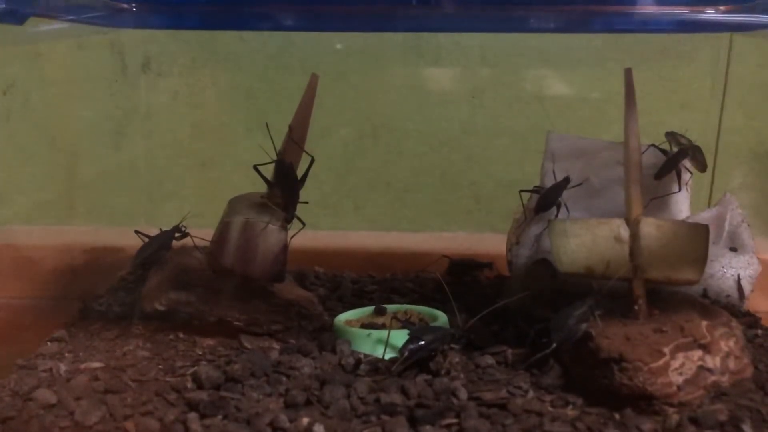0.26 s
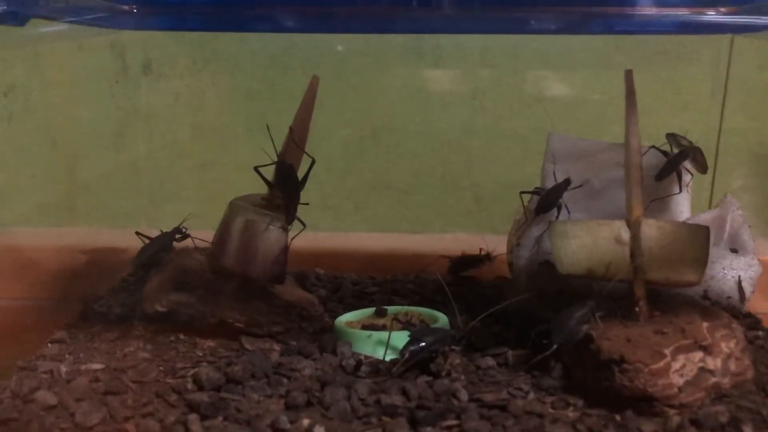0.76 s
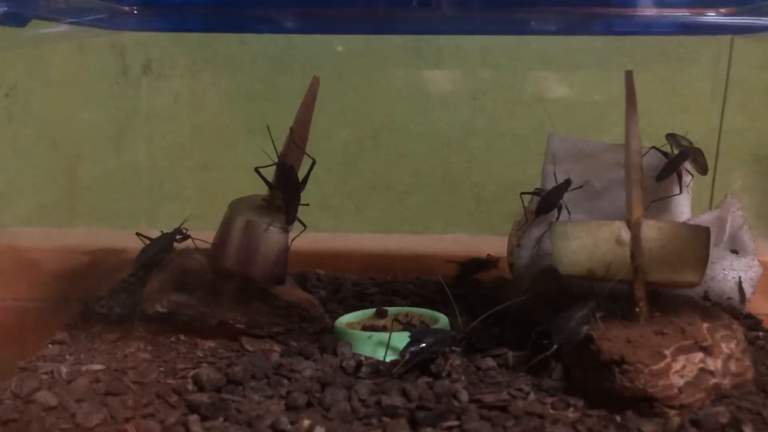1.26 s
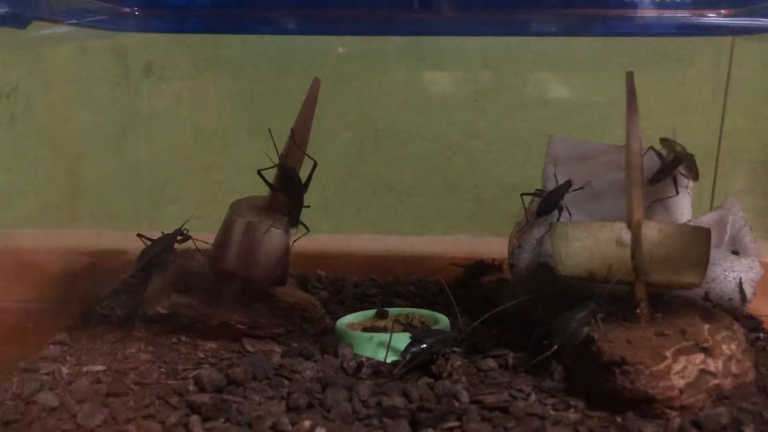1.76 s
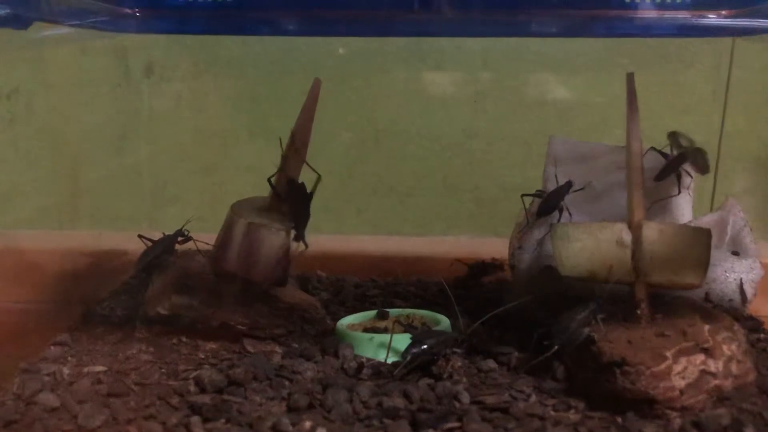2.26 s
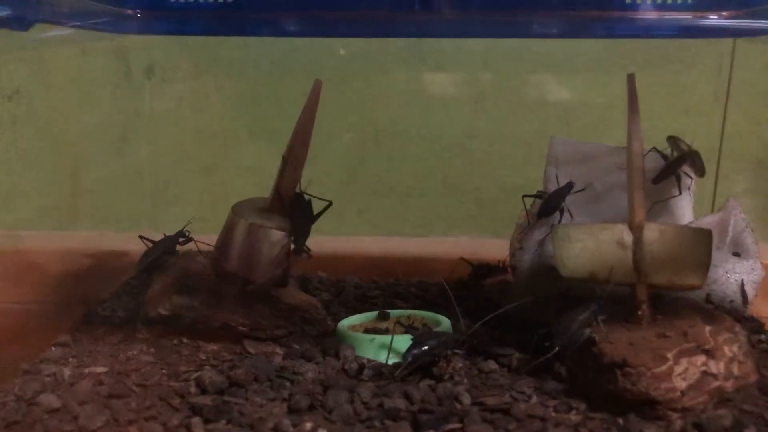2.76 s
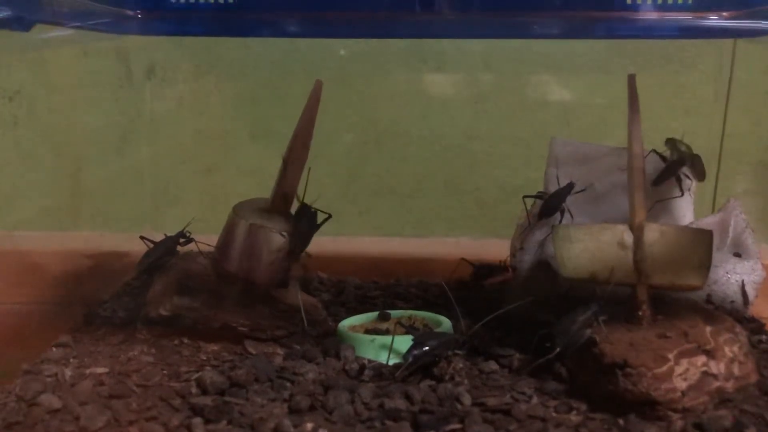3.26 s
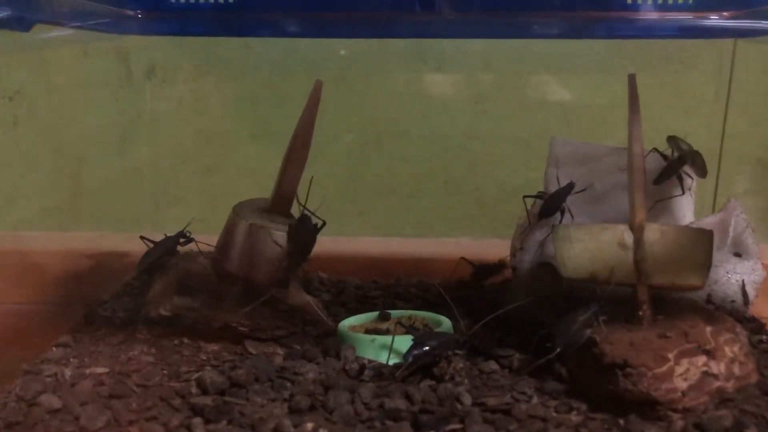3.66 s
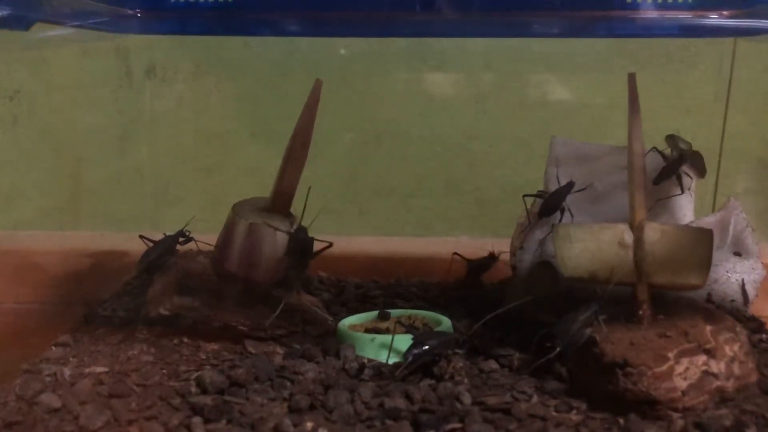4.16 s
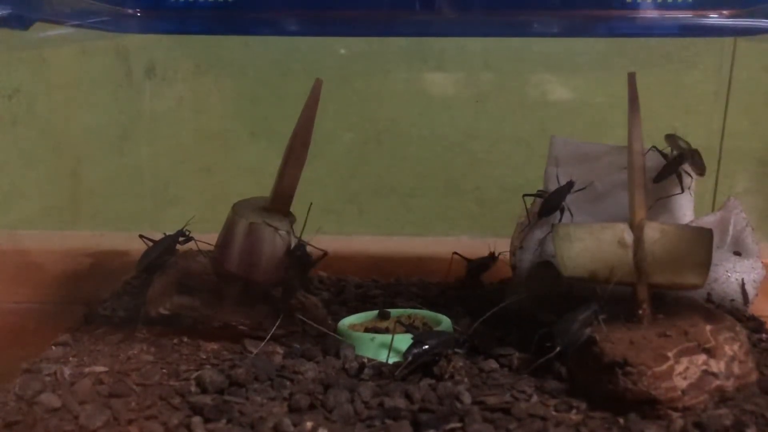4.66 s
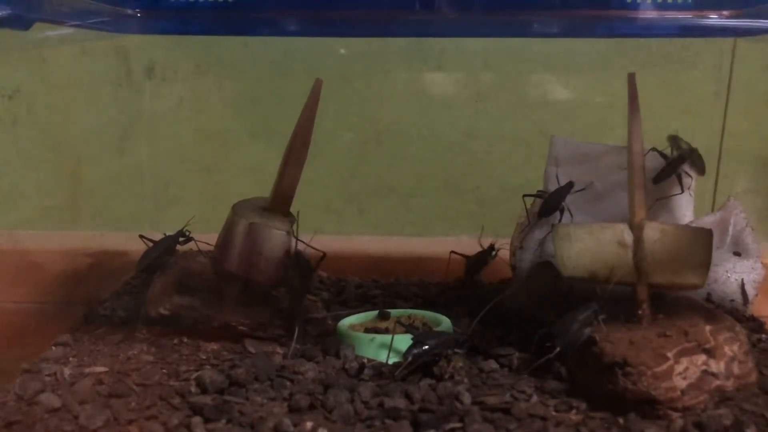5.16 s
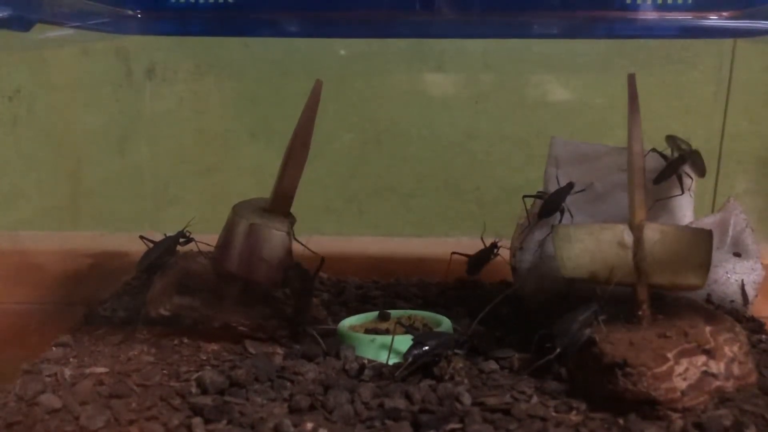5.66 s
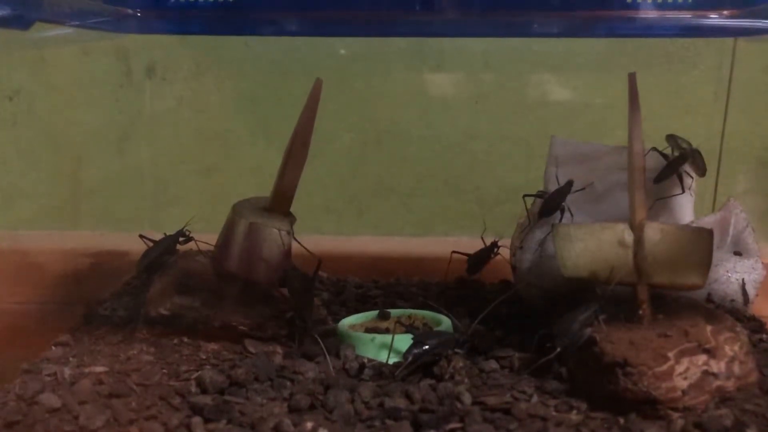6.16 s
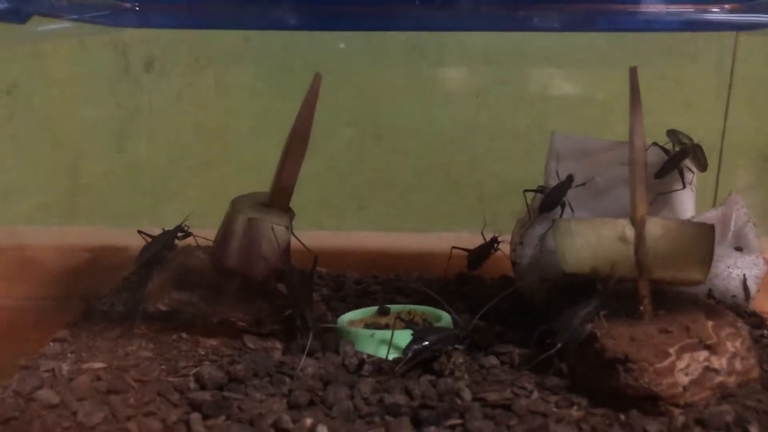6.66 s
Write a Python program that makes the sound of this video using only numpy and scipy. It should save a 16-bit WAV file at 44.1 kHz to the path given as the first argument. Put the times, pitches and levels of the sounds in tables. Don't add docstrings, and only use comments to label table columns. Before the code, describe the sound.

Several bell crickets sing overlapping high, ringing, rapidly pulsing trills in a glass tank, over a faint hum and hiss in a quiet room.

```python
import sys
import numpy as np
from scipy import signal
from scipy.fft import rfft, irfft
from scipy.io import wavfile

SR = 44100
rng = np.random.default_rng(int(sys.argv[2]) if len(sys.argv) > 2 else 0)


def elevation(decibels):
    levels = np.asarray(decibels, float)
    return 10 ** (levels / 20)


def dump(signal):
    limited = np.clip(np.atleast_2d(signal).T, -1, 1)
    pcm = np.round(limited * 32767).astype(np.int16)
    wavfile.write(sys.argv[1], SR, pcm)


N = 304290
TIME = np.arange(N) / SR
# (time [s], level [dB], time to fall 60 dB [s])
SKIDS = [
    (0.315, -59, 0.023),
    (4.233, -37, 0.018),
    (5.124, -37, 0.062),
    (5.215, -44, 0.024),
]


def columns(rows, at=TIME):
    s, *rest = np.transpose(rows)
    return [np.interp(at, s, c) for c in rest]


def coloured(points, gate=1):
    hz, db = np.transpose(points)
    grid_hz = np.arange(N // 2 + 1) * SR / N + 1e-3
    shape = elevation(np.interp(np.log(grid_hz), np.log(hz), db, -200, -200))
    spectrum = rfft(gate * rng.standard_normal(N))
    return irfft(spectrum * shape / np.sqrt(np.mean(shape ** 2)), N)


def narrow(hz, width):
    r = np.exp(-np.pi * width / SR)
    a = [1, -2 * r * np.cos(2 * np.pi * hz / SR), r * r]
    once = signal.lfilter([1, 0, -1], a, rng.standard_normal(N + SR))
    x = signal.lfilter([1], a, once)[SR:]
    return x / x.std()


def room(dry, wet_db, glass_db, wall_db):
    # (centre [Hz], time to fall 60 dB [s], level [dB])
    tail_bands = [(4700, .5, 0), (9500, .27, -7), (14300, .25, -3.5)]
    wall_s = 0.008
    t = np.arange(SR // 2) / SR
    reply = np.zeros(SR // 2)
    for hz, t60, db in tail_bands:
        band = signal.butter(2, [hz - 2400, hz + 2400], "band", fs=SR, output="sos")
        tail = rng.standard_normal(SR // 2) * elevation(-60 * t / t60) * np.clip(t / .008, 0, 1)
        tail *= elevation(wet_db) * np.sqrt(np.log(1e6) / SR / tail_bands[0][1])
        tail[round(wall_s * SR)] += elevation(wall_db)
        reply += elevation(db) * signal.sosfilt(band, tail)
    glass = rng.standard_normal(SR // 2) * elevation(-60 * t / 0.023)
    reply += elevation(glass_db) * glass / np.sqrt(np.sum(glass ** 2))
    heard = dry + signal.fftconvolve(dry, reply)[:N]
    return heard / np.sqrt(1 + elevation(2 * wet_db) + elevation(2 * glass_db) + elevation(2 * wall_db))


def strokes(phrases, count):
    out = []
    for s, total, first_ms, last_ms, drag_ms in phrases:
        k = np.arange(total - 1)
        slowing = (k / (total - 1)) ** 2
        beats_ms = first_ms + (last_ms - first_ms) * slowing + drag_ms * (k < count)
        out.append(s + np.append(0, np.cumsum(beats_ms)) / 1000)
    return out


def unskidded(phrases):
    times = np.concatenate(phrases)
    late = times[:, None] - np.array(SKIDS)[:, 0]
    return times[~np.any((late > 0) & (late < .017), axis=1)]


def tiring(phrases, fresh, opening, closing, entry=(0, .01)):
    offset, settle_s = entry
    rows = []
    for p, a, b in zip(phrases, opening, closing):
        settled = p[0] + settle_s
        tired = settled + np.clip(fresh, .01, .5) * (p[-1] - p[0] - settle_s)
        rows += [(p[0] - .008, a + offset), (settled, a), (tired, a), (p[-1] + .006, b)]
    return columns(rows)[0]


def wings(times, pitch_hz, partials_db, duty, lead, sag, rasp_db, tick_db, uneven_db):
    # (frequency [Hz], level per Hz [dB])
    rasp_spectrum = [(2500, -35), (3600, -17), (4030, -11), (4170, 7), (4500, -6.5), (5300, 2.5),
                     (6100, -5), (6600, -10), (8500, -12.5), (10100, -8), (10400, -30), (10800, -16.5),
                     (11200, -11.5), (15800, -15.5)]
    # (frequency [Hz], level per Hz [dB])
    tick_spectrum = [(4600, -16), (5300, -6), (5900, 4), (6500, -8), (7500, -10.5), (9000, -17.5),
                     (10600, -15.5), (11800, -15.5), (13500, -24), (14900, -6.5), (15500, -3),
                     (15820, -12.5)]
    luck = np.clip(rng.standard_normal((len(times), 5)), -1.8, 1.8)

    beat, usual = np.diff(times, append=np.inf), np.median(np.diff(times))
    beat = np.where(beat > 3 * usual, usual, np.minimum(beat, 1.7 * usual))
    duty_then = (duty * np.ones(N))[(times * SR).astype(int)]
    length = beat * duty_then * (1 + .05 * luck[:, 1])
    starts = times - lead * length + 0.00017 * luck[:, 0]

    which = np.clip(np.searchsorted(starts, TIME) - 1, 0, None)
    since = TIME - starts[which]
    along = np.clip(since / length[which], 0, 1)
    swell = np.sin(np.pi / 2 * np.clip(along / .3, 0, 1) * np.clip((1 - along) / .4, 0, 1)) ** 2
    swell *= 2 * elevation(uneven_db * luck[which, 3])

    hz = pitch_hz * (1 + sag * (.5 - along) + .004 * luck[which, 2])
    phase = 2 * np.pi * np.cumsum(hz) / SR + 10 * luck[which, 0]
    tone = swell * sum(elevation(db) * np.sin((k + 1) * phase) for k, db in enumerate(partials_db))
    rasp = coloured(rasp_spectrum, swell * elevation(partials_db[0] + rasp_db))
    catch = (since > 0) * elevation(-60 * np.abs(since) / .006 + 3 * luck[which, 4])
    return tone + rasp + coloured(tick_spectrum, catch * elevation(partials_db[0] + tick_db))


def room_tone():
    # (frequency [Hz], level per Hz [dB])
    hum = [(15, -73), (25, -33), (45, -17.5), (65, 2.5), (92, -7.5), (124, 0), (201, -8), (231, -4),
           (300, -6.5), (331, -6.5), (374, -10.5), (438, -7), (816, -14), (1930, -17), (3000, -27.5),
           (3900, -62), (6600, -120)]
    # (frequency [Hz], level per Hz [dB])
    hiss = [(1760, -27.5), (3000, -5), (3260, -8.5), (3590, -4), (4880, -13.5), (5420, -2), (5970, -12),
            (7350, -12), (9320, -15), (10600, -16.5), (12200, -19), (15200, -6), (15800, -5)]
    # (frequency [Hz], width [Hz], level [dB])
    distant = [(5560, 220, -82.5), (5160, 120, -94), (119.6, 8.3, -74.5)]
    # (time [s], level [dB])
    rustle = [
        (.18, -100),
        (.24, -73),
        (.3, -68.5),
        (.42, -77),
        (.55, -78),
        (.7, -100),
    ]
    tones = sum(elevation(db) * narrow(hz, width) for hz, width, db in distant)
    scratch = elevation(columns(rustle)[0]) * narrow(4400, 700)
    return elevation(-65.5) * coloured(hum) + elevation(-71.5) * coloured(hiss) + tones + scratch


def skids():
    gate = sum(elevation(db - 60 * np.abs(TIME - s) / t60) * (TIME > s) for s, db, t60 in SKIDS)
    rasp = coloured([(2800, -18.5), (4200, 2), (7500, 1.5), (9500, -21.5), (11500, 4.0), (15800, -27)], gate)
    return room(rasp, wet_db=-9.5, glass_db=-2.5, wall_db=-9.5)


def back_male():
    # (first stroke [s], strokes [count], first beat [ms], last beat [ms], drag of opening beats [ms])
    beats = [
        (.5679, 6, 18.36, 18.36, 0),
        (.7677, 25, 17.3, 17.62, 0),
        (1.2517, 29, 17.56, 17.49, 0),
        (2.2267, 21, 18.9, 18.46, 0),
        (3.3086, 21, 18.77, 20.15, 0),
        (4.5159, 33, 18.16, 18.7, 0),
        (5.5726, 43, 18.4, 19.71, 0),
    ]
    # (fresh level [dB], spent level [dB], wing pitch [Hz], sounding share of a beat [0-1])
    voice = [(-41.5, -43.5, 4800, .23), (-41.5, -36.5, 4760, .4), (-37.5, -42, 4710, .51),
             (-38, -30, 4705, .53), (-32, -32.5, 4710, .58), (-33, -37, 4680, .56), (-33.5, -41, 4675, .6)]
    phrases = strokes(beats, count=0)
    fresh_db, spent_db, pitch_hz, share = np.transpose(voice)
    db = tiring(phrases, 0.18, fresh_db, spent_db, entry=(-1.5, .06))
    hz = tiring(phrases, 0, pitch_hz, pitch_hz - 30)
    duty = tiring(phrases, 0, .9 * share, 1.3 * share)
    song = wings(np.concatenate(phrases), hz, [db, db - 15.5, db - 39.5],
                 duty, lead=0.09, sag=.035, rasp_db=-18, tick_db=-11, uneven_db=1.5)
    return room(song, wet_db=-2.0, glass_db=-3.5, wall_db=-1.5)


def chorus():
    # (time [s], peak level [dB], hold [s], fade [dB/s])
    swells = [
        (0.89, -28, 0.065, 42.5),
        (1.2, -41, 0.55, 20),
        (1.813, -30.5, 0.2, 21),
        (2.62, -30, .15, 19),
        (2.907, -25.5, 0.042, 29.5),
        (3.36, -29.5, 0.19, 30),
        (3.64, -27.5, 0.37, 37),
        (4.197, -23.5, 0.034, 18.5),
        (5.1, -28.5, 0.56, 19.5),
    ]
    # (time [s], pitch [Hz])
    pitch = [(0.9, 4773), (1.63, 4677), (1.94, 4797), (2.23, 4685), (3.17, 4775), (4.82, 4668),
             (5.16, 4774), (5.36, 4688), (6.38, 4684)]
    rise_db_per_s, stop_s = 221, 6.38
    levels_db = []
    for s, peak_db, hold, fade in swells:
        rising = rise_db_per_s * np.clip(s - TIME, 0, None)
        fading = fade * np.clip(TIME - s - hold, 0, None)
        levels_db.append(peak_db - rising - fading)
    db = np.max(levels_db, axis=0)
    mean_hz, = columns(pitch)
    partials_db = [db - 6.5, db - 29, db - 43]
    song = sum(wings(np.arange(.8, 6.37, 1 / beats_hz), mean_hz * tuning, partials_db,
                     duty=.7, lead=0, sag=.04, rasp_db=-21.5, tick_db=-10, uneven_db=2.1)
               for beats_hz, tuning in [(53.3, .966), (56.1, .992), (54.6, 1.022)])
    return room(song * (TIME < stop_s), wet_db=1.0, glass_db=-4.5, wall_db=-16)


def ticking_male():
    # (first stroke [s], strokes [count], first beat [ms], last beat [ms], drag of opening beat [ms])
    beats = [
        (.8898, 15, 18.32, 18.07, 0),
        (1.872, 16, 18.86, 18.7, 13.57),
        (2.9285, 21, 18.88, 19.29, 0),
        (3.676, 27, 19.17, 21.62, 0),
    ]
    # (fresh level [dB], spent level [dB], wing pitch [Hz], pitch lost by the end [Hz])
    voice = [(-28, -34, 4815, 35), (-24.5, -34.5, 4850, 110), (-26, -33, 4840, 89), (-26, -34.5, 4845, 83)]
    fresh = .3
    phrases = strokes(beats, count=1)
    fresh_db, spent_db, pitch_hz, sink_hz = np.transpose(voice)
    db = tiring(phrases, fresh, fresh_db, spent_db, entry=(0.3, .04))
    hz = tiring(phrases, fresh, pitch_hz, pitch_hz - sink_hz)
    song = wings(np.concatenate(phrases), hz, [db, db - 18.0, db - 36.5],
                 duty=.74, lead=.12, sag=.03, rasp_db=-32, tick_db=-5.5, uneven_db=0.5)
    return room(song, wet_db=0.9, glass_db=-1.5, wall_db=-1.5)


def front_male():
    # (first stroke [s], strokes [count], first beat [ms], last beat [ms], drag of opening beats [ms])
    beats = [
        (1.1646, 38, 17.48, 19.75, 0),
        (1.9643, 35, 17.22, 19.34, 0),
        (2.5905, 39, 17.37, 20.33, 4.98),
        (3.338, 44, 17.7, 20.6, 7.38),
        (4.1945, 46, 18.1, 18.89, 14.07),
        (5.0905, 45, 18.53, 19.2, 5.58),
    ]
    # (fresh octave [dB], spent octave [dB], wing pitch [Hz], fundamental over octave [dB])
    voice = [(-53, -51, 4738, 5.5), (-43, -57, 4755, 4.5), (-38.5, -51, 4745, 12), (-40.5, -47, 4750, 10.5),
             (-38, -49, 4742, 8), (-39, -46.5, 4750, 10)]
    phrases = strokes(beats, count=2)
    fresh_db, spent_db, pitch_hz, over_db = np.transpose(voice)
    second = tiring(phrases, .08, fresh_db, spent_db, entry=(-5, .025))
    third = -49.5 + 1.6 * (second + 40)
    first = second + tiring(phrases, 0, over_db, over_db)
    hz = tiring(phrases, 0, pitch_hz, pitch_hz - 24.95, entry=(50, .14))
    song = wings(unskidded(phrases), hz, [first, second + 0.92, third],
                 duty=.74, lead=.46, sag=.028, rasp_db=-26, tick_db=-19.5, uneven_db=-1.7)
    return room(song, wet_db=2.5, glass_db=-12.5, wall_db=-17.5)


def scene():
    return (room_tone() + skids() + back_male() + chorus() + ticking_male() + front_male())[None]


def top_cut(x):
    return signal.sosfilt(signal.butter(12, 16490, fs=SR, output="sos"), x)


def record(dry):
    top_hz = 15830
    hz = np.arange(N // 2 + 1) * SR / N
    mix = irfft(rfft(dry) * (hz < top_hz), N)
    return top_cut(mix)


dry = scene()
out = record(dry)
dump(out)
```